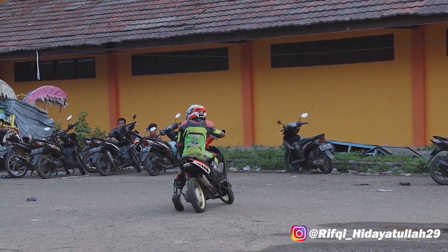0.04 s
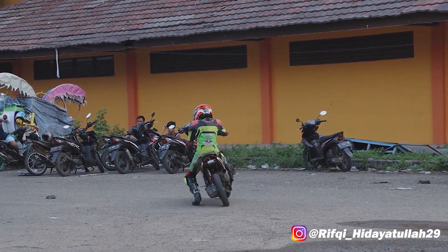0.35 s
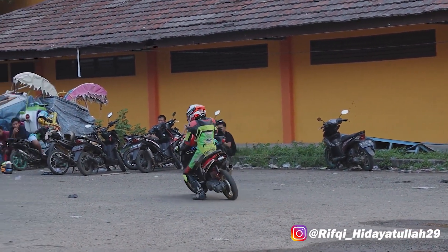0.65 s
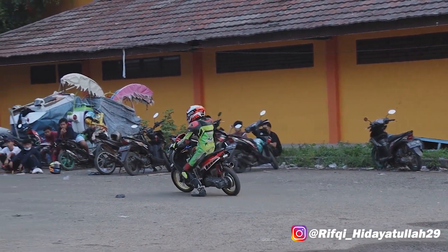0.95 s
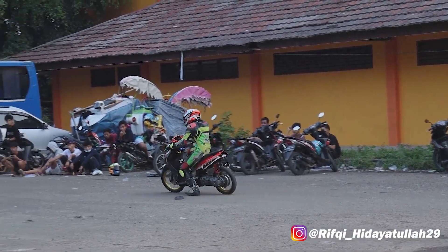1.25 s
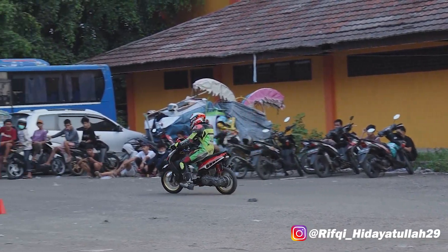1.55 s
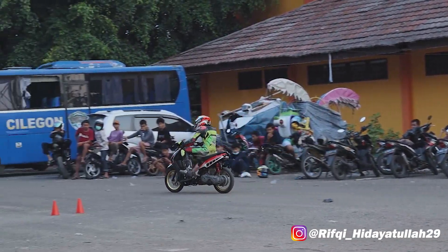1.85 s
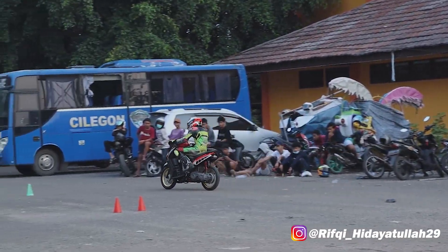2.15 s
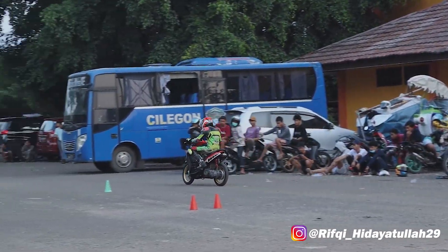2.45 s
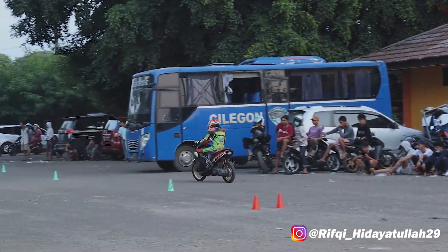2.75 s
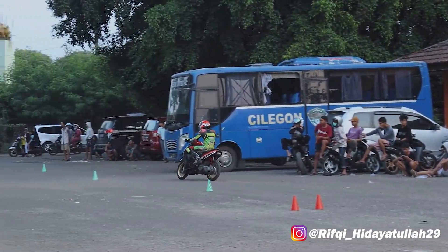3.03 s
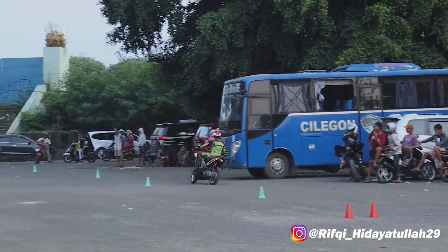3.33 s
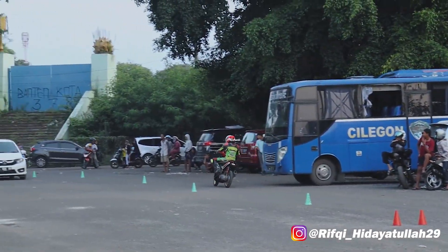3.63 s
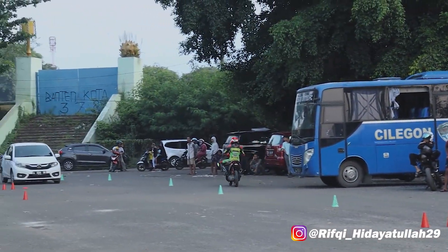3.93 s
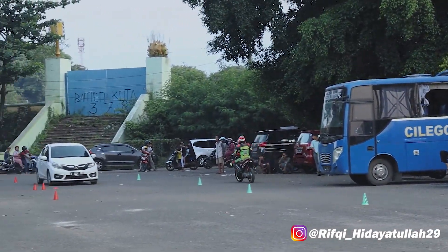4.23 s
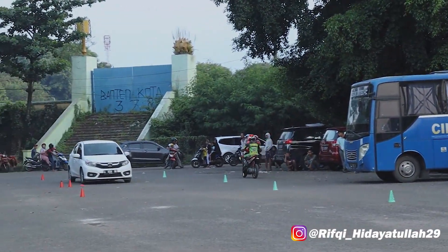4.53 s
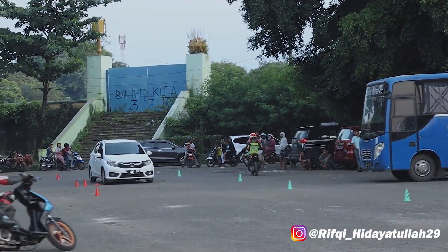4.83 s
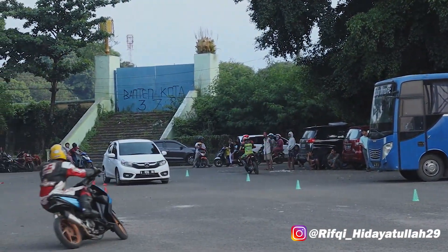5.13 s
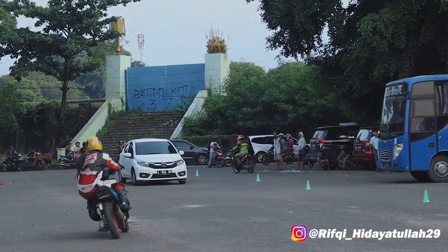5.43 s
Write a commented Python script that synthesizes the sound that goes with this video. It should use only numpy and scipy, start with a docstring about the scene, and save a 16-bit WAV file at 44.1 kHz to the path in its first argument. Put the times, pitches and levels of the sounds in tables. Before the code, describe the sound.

In an open paved yard with a steady low drone, a scooter engine accelerates with a throbbing, hissy note and grows more distant, while another idles and gives a quick rev. The lead engine cuts back with a backfire pop and sputters down. The second scooter barks up close to the microphone, then eases off just before a brief, louder exhaust thump. Both echo faintly off a wall.

```python
"""A single-cylinder scooter pulls hard round an open car park while a second potters behind it. Each firing
rings the exhaust pipe and spits hiss; fan, belt and tyres rush; the yard drones; a long wall and parked
vehicles echo the engines. At 1.75 s the second blips as the lead draws away. At 3.5 s the lead shuts its
throttle, misses, bangs unburnt fuel in the pipe and rolls on. The second comes near at 3.7 s and opens
up at 4.3 s. A short, louder thump fills the last tenth of a second."""
import sys
import numpy as np
from scipy import signal
from scipy.io import wavfile
from scipy.ndimage import uniform_filter1d

SR = 44100
rng = np.random.default_rng(int(sys.argv[2]) if len(sys.argv) > 2 else 0)


def persist_wave(psi):
    """Save psi, clipped to +-1, as 16-bit WAV."""
    counts = np.round(np.clip(psi, -1, 1) * 32767).astype(np.int16)
    wavfile.write(sys.argv[1], SR, np.atleast_2d(counts).T)


N = 246078
T = np.arange(N) / SR


def amp(db):
    return 10 ** (np.asarray(db) / 20)


def curve(table):
    """Time table, interpolated to every sample."""
    return np.interp(T, *np.transpose(table))


def at_hz(table, hz):
    """Frequency table, interpolated on a log axis."""
    f, value = np.transpose(table)
    return np.interp(np.log(hz + 1), np.log(f), value)


def ramp(start_s, takes_s):
    return np.clip((T - start_s) / takes_s, 0, 1)


def swell(start_s, rise_s, hold_s, fall_s):
    return ramp(start_s, rise_s) - ramp(start_s + rise_s + hold_s, fall_s)


def wander(rate_hz, count=400):
    """Random values joined by straight lines."""
    return np.interp(T * rate_hz, np.arange(count), rng.standard_normal(count))


def steady(x, size=6000):
    """Slow rms held at 1; single firings pass."""
    return x / np.sqrt(abs(uniform_filter1d(uniform_filter1d(x ** 2, size), size)) + 1e-14)


def colour(x, spectrum, size=16384):
    """Minimum-phase filter from a spectrum table."""
    log_gain = np.log(amp(at_hz(spectrum, abs(np.fft.fftfreq(size, 1 / SR)))))
    response = np.fft.ifft(np.exp(np.conj(signal.hilbert(log_gain)))).real
    return signal.fftconvolve(x, response[:size // 4])[:N]


def lowpass(x, hz, order=4):
    return signal.sosfiltfilt(signal.butter(order, hz, fs=SR, output="sos"), x)


def highpass(x, hz, order=2):
    return signal.sosfilt(signal.butter(order, hz, "high", fs=SR, output="sos"), x)


def resonate(x, hz, width_hz):
    """One mode; hz may vary in time."""
    turn = np.exp(2j * np.pi * np.cumsum(hz * np.ones(N)) / SR)
    pole = np.exp(-np.pi * width_hz / SR)
    return 2 * (turn * signal.lfilter([1 - pole], [1, -pole], x / turn + 1e-18)).real


def firings(rate_hz, fires_at_s):
    """Index of the nearest firing and time since it (negative just before)."""
    turns = np.cumsum(rate_hz) / SR
    turns -= np.interp(fires_at_s, T, turns)
    nearest = np.round(turns)
    return (nearest - nearest[0]).astype(int), (turns - nearest) / rate_hz


def per_firing(cycle):
    """One random value held per firing."""
    return rng.standard_normal(512)[cycle]


def burst(since_s, rise_s, fall_s):
    """Valve opens fast, pressure bleeds away."""
    return np.exp(np.minimum(since_s, 0) / rise_s - np.maximum(since_s, 0) / fall_s)


# Silencer transmission: f/Hz, level/dB
SILENCER_RESPONSE = [(25, -44), (55, -23.5), (105, 1), (155, 3), (205, 3), (280, 1.5), (335, -0.5),
                     (410, -10), (510, -19.5), (630, -12.5), (760, -21.5), (920, -19), (1200, -22.5),
                     (3500, -46)]
def lead_exhaust(cycle, since_s, strength, throttle, note_hz, returned=0.42):
    """Puffs, sharper with open throttle, echo along the pipe and leave through the silencer."""
    jittered_s = since_s - 0.00003 * per_firing(cycle)
    width_s = 0.0001 + 0.00098 * (1 - throttle)
    puff = strength * np.exp(-0.5 * ((jittered_s + 0.00013) / width_s) ** 2)
    wave = sum(returned ** k * np.interp(T - k / note_hz, T, puff, left=0) for k in range(5))
    lowest_mode = resonate(wave, note_hz, width_hz=84.4)
    return colour(wave + 1.87 * lowest_mode, SILENCER_RESPONSE)


def lead_boom(lows, rate_hz, pulls_hz=38):
    """Exhaust lows: waver, dip at the misfire, fade at revs too low to pull."""
    miss_db = -6 * np.exp(-0.5 * ((T - 3.533) / 0.016) ** 2)
    waver_db = 1.5 * wander(rate_hz=7.1)
    fade_db = -4.6 * np.maximum(pulls_hz - rate_hz, 0)
    return steady(lows) * amp(miss_db + waver_db + fade_db)


# Air rush spectrum: f/Hz, relative level/dB
RUSH_SPECTRUM = [(300, -9), (600, 2.5), (950, 0), (1400, 0), (1900, -1.5), (2500, -5), (3200, -12),
                 (3600, -15), (4100, -39), (6000, -26.5), (10000, -30), (15000, -40)]
def rush(chuff=0, pulsed=0):
    """Even noise of fan, belt and tyres; a share `pulsed` of the input power is chuff."""
    air = np.sqrt(pulsed) * chuff + np.sqrt(1 - pulsed) * rng.standard_normal(N)
    return steady(colour(air, RUSH_SPECTRUM))


def intake_rasp(since_s, strength, throttle, side):
    """A chuff per firing tail-on, mostly even rush side-on."""
    blowdown = burst(since_s - 0.0015 * (1 - throttle), 0.0008, 0.0035 + 0.003 * throttle)
    chuff = steady(strength * blowdown * rng.standard_normal(N))
    return rush(chuff, pulsed=0.9 - 0.845 * side ** 2)


def jet(cycle, since_s, spectrum, fall_s, leak, scatter_db, flicker_db):
    """Turbulent gas spits at each firing and leaks between; a close reflection tints each spit."""
    size = amp(scatter_db * per_firing(cycle) + flicker_db * wander(rate_hz=15))
    gas = (burst(since_s + 0.00056, 0.000073, fall_s) * size + leak) * rng.standard_normal(N)
    lag_s = 0.000573 * np.exp(0.27 * per_firing(cycle))
    reflection = 0.5 * np.interp(T - lag_s, T, gas)
    return steady(colour(gas + reflection, spectrum), size=10000)


# Lead tailpipe hiss: f/Hz, relative level/dB
LEAD_JET_SPECTRUM = [(2290, -19), (3900, 5.5), (4250, 3), (5990, 6), (6680, 3.5), (7460, 5), (10700, 5),
                     (12500, -0.5), (13800, -2), (14400, 0), (15600, -15)]
def lead_jet(cycle, since_s, side):
    """The highest hiss beams out of the tail; side-on it is duller and more even."""
    leak = 0.058 + 0.282 * side ** 2
    beaming = 0.78 * (1 - side ** 2)
    spit = jet(cycle, since_s, LEAD_JET_SPECTRUM, fall_s=0.00085, leak=leak, scatter_db=1.8, flicker_db=5)
    return steady(spit - beaming * lowpass(spit, 7900, order=2), size=10000)


def belt_case(hz=1766, width_hz=750):
    """Belt noise resonates in its case."""
    return steady(resonate(resonate(rng.standard_normal(N), hz, width_hz), hz, width_hz))


def silencer_shell(since_s):
    """Each puff knocks the shell into ringing."""
    knock = (burst(since_s + 0.00008, 0.000067, 0.00047) + 0.053) * rng.standard_normal(N)
    return steady(resonate(resonate(knock, hz=2620, width_hz=460), hz=3430, width_hz=550))


def silencer_chamber(exhaust):
    """The chamber hums out of the tail."""
    return steady(resonate(resonate(exhaust, hz=425, width_hz=127), hz=439, width_hz=130))


def crack(cycle, since_s, scatter_db=2.7):
    """Each puff's sharp front slips straight through the silencer."""
    front = burst(since_s + 0.0001, 0.00009, 0.00096) * amp(scatter_db * per_firing(cycle))
    return steady(lowpass(highpass(front, 85.5, order=1), 4100, order=2))


# Range: t/s, distance/m
LEAD_RANGE_M = [(0, 12.7), (1.85, 12.64), (2.1, 20.3), (2.7, 21.9), (3.3, 23.7), (4.4, 23.3), (5.58, 47)]
# Per part: base level/dB, then change/dB per distance doubling, side-on, revs climbing, shut, in a surge
LEAD_MIX_DB = { "boom": (-9.5, -5, -2.5, -1.84, -0.5, 3), "overtones": (-28, -4.5, 0, 0.5, -12, -4.5),
               "crack": (-31.5, 0, 0.5, 2.5, -19, 1), "chamber": (-28.5, -5.5, -11, 1.5, -8, 14),
               "rasp": (-35.5, -7.5, 4.5, -1.4, 1, 9.5), "jet": (-39, -6.5, -1, 0.5, -18, 1),
               "shell": (-39, -19, -4.5, 0.2, -43, 18), "belt": (-47, -11.5, 16, 2.2, 3, -12)}
def lead_mix(parts, side, climb, shut, surge):
    """Each part follows distance, heading, load and throttle by its own amounts."""
    distance_m = curve(LEAD_RANGE_M)
    doublings = np.log2(distance_m / distance_m[0])
    mix = 0
    for name, (db, far_db, side_db, climb_db, shut_db, surge_db) in LEAD_MIX_DB.items():
        drive_db = climb_db * climb + shut_db * shut + surge_db * surge
        mix += amp(db + far_db * doublings + side_db * side + drive_db) * parts[name]
    return mix


# Firing rate: t/s, f/Hz
LEAD_FIRING_HZ = [(0, 44.18), (.15, 46.88), (.39, 46.79), (.63, 50.16), (.98, 48.03), (1.59, 55.17),
                  (2.24, 55.65), (3.12, 55.17), (3.3, 56.14), (3.48, 55.95), (3.58, 50.19), (3.72, 47.86),
                  (3.99, 41.25), (4.47, 37.71), (5.11, 35.92), (5.58, 30.98)]
# Heading: t/s, side-on/0-1 (0 = tail-on)
LEAD_HEADING = [(0, 0.017), (.4, 0.075), (.8, 0.57), (1.1, 0.53), (1.45, 0.82), (1.83, 0.93), (2.05, 0.69),
                (3.5, 0.66), (4.1, 0.089)]
# Last squeeze, fuel bang, short closing thump: t/s, rise/s, hold/s, fall/s, strength/0-1
LEAD_SURGES = [(3.41, .045, .015, .04, 0.62), (3.554, .025, .05, .18, 0.98), (5.498, 0.065, .05, .1, 1)]
def lead_scooter(full_climb_hz_per_s=10):
    """Pulls hard, then coasts with uneven firings, strong and weak alternating for a while."""
    rate_hz, side = curve(LEAD_FIRING_HZ), curve(LEAD_HEADING)
    cycle, since_s = firings(rate_hz, fires_at_s=0.0091)
    shut = ramp(start_s=3.49, takes_s=0.088)
    surge = sum(force * swell(*timing_s) for *timing_s, force in LEAD_SURGES)
    throttle = np.clip(0.86 * (1 - shut) + (0.17 + 0.32 * surge) * shut, 0, 1)
    climb_hz_per_s = uniform_filter1d(np.gradient(rate_hz) * SR, size=5000)
    climb = np.clip(climb_hz_per_s / full_climb_hz_per_s, -1, 1) * (1 - shut)
    # Hotter gas raises the pipe note.
    note_hz = (1 - shut) * (185.9 + 4 * (rate_hz - 43.2)) + shut * (161.4 + 13.5 * surge)
    scatter_db = (0.52 + 2.6 * shut) * per_firing(cycle)
    alternate_db = 3 * swell(3.98, 0.12, 0.34, 0.12) * (-1.) ** cycle
    strength = amp(scatter_db + alternate_db)
    exhaust = lead_exhaust(cycle, since_s, strength, throttle, note_hz)
    lows = lowpass(exhaust, 527)
    parts = dict(
        boom=lead_boom(lows, rate_hz),
        overtones=steady(exhaust - lows) * (0.25 + 0.44 * throttle),
        rasp=intake_rasp(since_s, strength, throttle, side),
        jet=lead_jet(cycle, since_s, side),
        belt=belt_case(),
        shell=silencer_shell(since_s),
        chamber=silencer_chamber(exhaust),
        crack=crack(cycle, since_s))
    return lead_mix(parts, side, climb, shut, surge)


# Boom before the low-rev fade: t/s, level/dB
SECOND_BOOM_DB = [(0, -26.5), (.45, -22.5), (.7, -20), (1.25, -19.5), (1.6, -15), (2.1, -19.5),
                  (2.85, -16.5), (3.7, -20), (4.65, -20.5), (4.95, -15), (5.25, -14), (5.5, -15.5)]
def second_boom(puff, rate_hz, throttle, pulls_hz=34.65):
    """A deeper pipe: its note rises with throttle and fades at revs too low to pull."""
    ring = resonate(puff, hz=139.4 + 31.4 * throttle, width_hz=35.2)
    boom = steady(lowpass(highpass(ring, 79.4, order=3), 266, order=2))
    fade_db = -0.5 * np.maximum(pulls_hz - rate_hz, 0)
    return boom * amp(curve(SECOND_BOOM_DB) + fade_db)


# Upper pipe modes: f/Hz, width/Hz, relative level/dB
BARK_MODES = [(260, 130, -7), (331, 35, -7), (427, 70, 3)]
def second_bark(puff):
    """Puffs ring the pipe's upper modes."""
    ring = sum(amp(db) * resonate(puff, hz, width_hz) for hz, width_hz, db in BARK_MODES)
    return steady(highpass(ring, 125))


# Second tailpipe hiss: f/Hz, relative level/dB
SECOND_JET_SPECTRUM = [(2290, -28), (3900, -5.5), (6800, -2.5), (8430, 0), (9240, 7.5), (10200, 6),
                       (11900, -3), (13900, -4), (15600, -14)]
def second_jet(cycle, since_s):
    """Longer spits over a steady gas flow."""
    return jet(cycle, since_s, SECOND_JET_SPECTRUM, fall_s=0.0012, leak=0.3, scatter_db=0, flicker_db=4)


# Engine casing modes: f/Hz, width/Hz, relative level/dB
CASING_MODES = [(1364, 140, -10), (2640, 960, -9.5)]
def casing_rattle(since_s):
    """Valve gear shakes the second engine's casing every cycle."""
    shake = (burst(since_s, 0.00043, 0.0031) + 1.6) * rng.standard_normal(N)
    return steady(sum(amp(db) * steady(resonate(resonate(shake, hz, width_hz), hz, width_hz))
                      for hz, width_hz, db in CASING_MODES))


# Firing rate: t/s, f/Hz
SECOND_FIRING_HZ = [(0, 32.97), (.55, 35.36), (1.86, 35.27), (2.05, 53.85), (2.34, 45.66), (2.78, 40.28),
                    (3.4, 35.97), (4.27, 27.2), (4.4, 32.18), (4.6, 37.37), (4.85, 40.18), (5.08, 41),
                    (5.3, 34.1), (5.58, 30.5)]
# Throttle blips: t/s, hold/s, opening/0-1
THROTTLE_BLIPS = [(1.75, 0.021, 0.66), (4.27, 0.41, 0.92)]
# Per part: far idle level/dB, change when near/dB, change at full throttle/dB
SECOND_MIX_DB = { "bark": (-46, -7, 19), "jet": (-74.5, 21.6, 11.3), "casing": (-68, 12.5, 10.5),
                 "rush": (-60, 9.6, 9.6)}
def second_scooter(rise_s=0.37, fall_s=0.34, scatter_db=1.1):
    """Potters, barks under throttle, hisses once near."""
    rate_hz = curve(SECOND_FIRING_HZ)
    cycle, since_s = firings(rate_hz, fires_at_s=4.27)
    throttle = sum(opening * swell(t, rise_s, hold_s, fall_s) for t, hold_s, opening in THROTTLE_BLIPS)
    near = ramp(start_s=3.7, takes_s=0.33)
    puff = amp(scatter_db * per_firing(cycle)) * np.exp(-0.5 * ((since_s - 0.0003) / 0.00066) ** 2)
    boom = second_boom(puff, rate_hz, throttle)
    parts = dict(bark=second_bark(puff), jet=second_jet(cycle, since_s),
                 rush=rush(), casing=casing_rattle(since_s))
    return boom + sum(amp(db + near_db * near + open_db * throttle) * parts[name]
                      for name, (db, near_db, open_db) in SECOND_MIX_DB.items())


# Background spectrum: f/Hz, relative level/dB
YARD_SPECTRUM = [(25, -33), (60, -36.5), (110, 5.5), (200, 7.5), (400, -12), (800, -43.5), (2000, -33.5),
                 (3300, -27.5), (4200, -41.5), (10000, -39), (16000, -49)]
def yard_drone():
    """Steady low noise."""
    return steady(colour(rng.standard_normal(N), YARD_SPECTRUM))


# Echo decay: f/Hz, T60/s
ECHO_T60_S = [(100, 0.73), (500, 1), (2000, 0.55), (10000, 0.053)]
def car_park_echo(x, wall_s=0.025, returns_per_s=1500, size=30000):
    """Scattered returns from wall and parked vehicles; treble dies first."""
    taps = rng.standard_normal(size) * (rng.random(size) < returns_per_s / SR)
    taps *= np.arange(size) > wall_s * SR
    hz, t, bins = signal.stft(taps, SR, nperseg=256)
    decay = amp(-60 * t / at_hz(ECHO_T60_S, hz)[:, None])
    _, tail = signal.istft(bins * decay, SR, nperseg=256)
    return signal.fftconvolve(x, tail / np.linalg.norm(tail))[:N]


def scene():
    """Both scooters, yard drone and echoes; mono."""
    engines = lead_scooter() + second_scooter()
    return (engines + amp(-26) * yard_drone() + amp(-17) * car_park_echo(engines))[None]


def record(dry, edge_hz=15750):
    """Soft clip, then band limit."""
    rounded = dry / (1 + dry ** 8) ** (1 / 8)
    band_limit = signal.firwin(511, edge_hz, window=("kaiser", 9), fs=SR)
    return signal.oaconvolve(rounded, band_limit[None], "same")


dry = scene()
out = record(dry)
persist_wave(out)
```